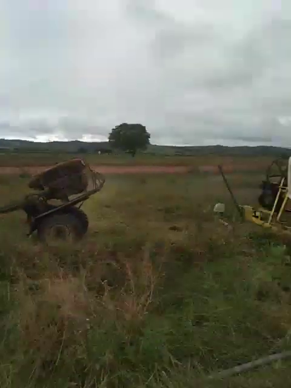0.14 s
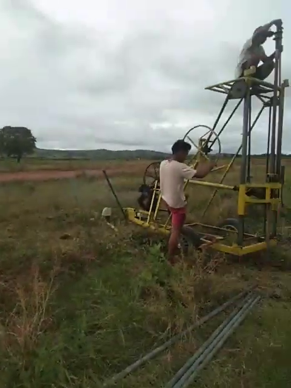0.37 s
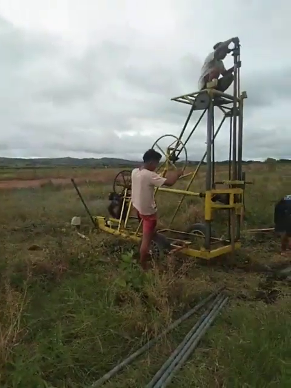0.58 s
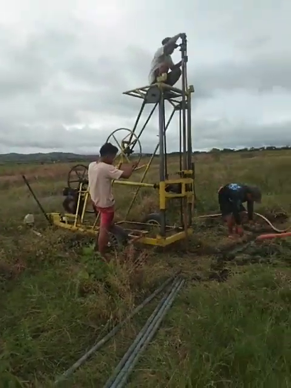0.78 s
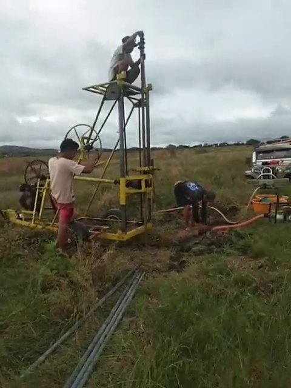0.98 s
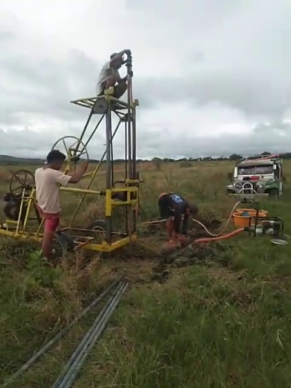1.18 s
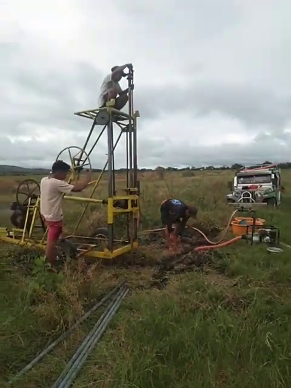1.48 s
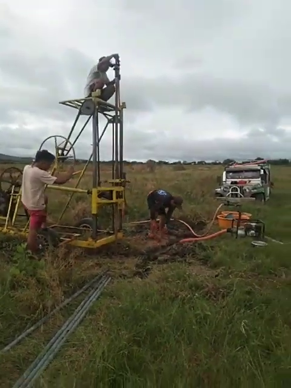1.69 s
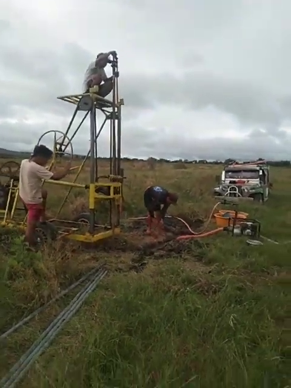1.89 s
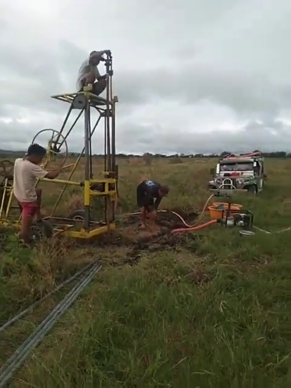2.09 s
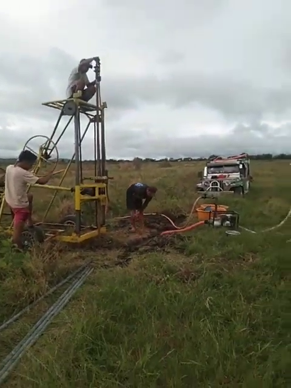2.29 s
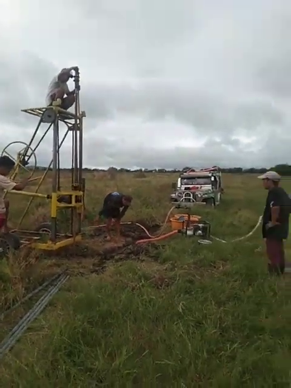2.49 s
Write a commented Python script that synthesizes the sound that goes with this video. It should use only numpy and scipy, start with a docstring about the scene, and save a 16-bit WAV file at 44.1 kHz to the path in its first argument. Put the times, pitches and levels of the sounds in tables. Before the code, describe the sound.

Single-cylinder diesel engine on a drilling rig clatters steadily, about sixteen sharp knocks a second, outdoors

```python
"""Open field: a single-cylinder diesel drives a well drilling rig, firing about 16 times a second.
Each firing is a set of noise bursts (knock, block ring, exhaust, piston slap, valves) over a steady
gear clatter, all ringing through casing resonances; soft low air pulses lie underneath.
The microphone swings round towards the rig: hollows glide through the tone and the level shifts.
Decaying sines make early bumps on its housing and late rig clanks; shaped noise makes gusts and rumble."""
import sys
import numpy as np
from scipy import signal
from scipy.fft import rfft, irfft
from scipy.io import wavfile
from scipy.ndimage import map_coordinates

SR = 44100
rng = np.random.default_rng(int(sys.argv[2]) if len(sys.argv) > 2 else 0)


def persist_wave(psi):
    """Save psi, clipped to +-1, as 16-bit WAV."""
    counts = np.round(np.clip(psi, -1, 1) * 32767).astype(np.int16)
    wavfile.write(sys.argv[1], SR, np.atleast_2d(counts).T)


N = 116865
TIME_S = np.arange(N) / SR

# Engine speed. Each row: time in seconds, firings per second.
SPEED = [(0, 16.22), (.45, 16.21), (.65, 16.15), (1.2, 16.15), (1.4, 16.19), (2.12, 16.19), (2.3, 15.92),
         (2.48, 16.15), (2.65, 16.17)]
FIRST_FIRING_S = .0607
# Hard firings. Each row: time in seconds, extra knock in dB, extra block ring in dB.
HARD_FIRINGS = [(.122, 0, 5), (.493, 2, 1), (.555, 2, 0), (.617, 2.5, 3), (.741, 2, 7.5), (1.112, 1.5, 9.5),
                (1.172, 1.5, 3), (1.235, 2, 0), (1.358, 2, 7), (1.79, 1.5, 6), (2.161, 2, 2),
                (2.349, 2.5, 7), (2.473, 5, 11.5)]

# Strokes of a cycle, before colour and casing. Each: delay after firing in seconds, attack in seconds,
# decay in seconds, level in dB, scatter in dB.
KNOCK = (-.0025, .0013, .0032, -15.8, 0.6)
BLOCK_RING = (-.0008, .0016, .0035, -25, 1.2)
EXHAUST = (.0115, .005, .0052, -19.1, 1.0)
EXHAUST_CRACK = (.0142, .0008, .003, -23.5, 1.2)
PISTON_SLAP = (.0045, .004, .012, -26.4, 1.5)
VALVE_CLOSE = (.0328, .0012, .0055, -24.8, 1.8)
VALVE_SEAT = (-.0165, .002, .006, -24.5, 2.0)
# Spectra of strokes and clatter. Each row: frequency in Hz, relative density in dB per Hz.
KNOCK_COLOUR = [(250, -29), (550, -31), (850, -17), (1200, -8), (1750, -5), (2600, -1), (4000, 0),
                (5000, 0), (6200, -4), (8300, -2), (10500, -10), (13000, -22), (16000, -33)]
BLOCK_COLOUR = [(700, -30), (1200, -13), (1550, -4), (1820, 0), (2200, -8), (2650, -5), (3300, -20),
                (8000, -40)]
EXHAUST_COLOUR = [(250, -21), (550, -24), (900, -13), (1400, -7), (2400, -3), (4200, -2), (6500, -1),
                  (8500, 0), (10500, -7), (13000, -19), (16000, -29)]
CRACK_COLOUR = [(1000, -30), (3000, -12), (6300, -2), (8800, 0), (11000, -4), (13000, -13), (16000, -28)]
SLAP_COLOUR = [(300, -30), (650, -24), (900, -5), (1300, -2), (2000, 0), (2800, 0), (4500, -4), (7000, -11),
               (14000, -33)]
VALVE_CLOSE_COLOUR = [(500, -28), (1500, -12), (2700, -5), (4300, -1), (6500, 0), (9000, -5), (12500, -18),
                      (16000, -27)]
VALVE_SEAT_COLOUR = [(600, -31), (1300, -7), (2500, 0), (4400, 0), (6000, -10), (9000, -15), (14000, -29)]
CLATTER_COLOUR = [(200, -24), (350, -29), (600, -23), (900, -18), (1400, -6), (2000, -1.5), (2800, 0),
                  (4500, 0), (6500, -8), (9500, -12), (13000, -29), (16000, -44)]
CLATTER_DB, CLATTER_GRAIN_DB = -30.9, 2.5  # level ahead of the casing, unevenness of grains
SAME_SHARE = .35  # share of a stroke's power that is alike in every cycle
STROKE_GRAIN_DB = 1.0
STROKE_RIPPLE_DB, STROKE_RIPPLE_HZ = 3.0, 380  # rms depth and spacing of points on a burst's own spectrum
# Resonances and gaps of casing and covers. Each row: frequency in Hz, width in Hz, boost in dB.
CASING = [(720, 120, -1.5), (930, 50, 13.5), (1285, 70, 6), (1420, 70, -3), (1505, 50, 5), (1830, 120, 3),
          (2030, 70, 7), (2230, 110, -3), (2450, 90, 4.5), (2755, 85, 8), (2966, 28, 7), (3130, 120, -3),
          (4440, 180, 3), (5863, 110, 3), (6330, 80, 8), (6760, 55, 9), (6920, 150, -4), (7560, 130, -5),
          (7860, 130, 6), (8400, 200, 2), (9040, 200, 3)]
# Low air pulses. Each row: delay after firing in seconds, length in seconds, pitch in Hz, width in Hz,
# relative level in dB.
THUMPS = [(-.003, .0075, 124, 60, -37), (.0115, .0052, 185, 70, -45)]
THUMP_SCATTER_DB = 1.4

# Engine level as the microphone turns. Each row: time in seconds, gain in dB.
LEVEL = [(0, -4.3), (.12, -2.5), (.2, .4), (.55, .2), (1.1, 0), (1.5, .3), (2.0, .7), (2.3, -.8),
         (2.65, -1.4)]
# Treble shelf as it turns. Each row: time in seconds, gain far above TREBLE_HZ in dB.
TREBLE = [(0, -10), (.15, -4), (.3, .3), (.55, 3), (1.0, .7), (1.5, 0), (2.0, -3), (2.65, -4)]
TREBLE_HZ = 8800  # half of the shelf's dB here
# Gliding hollows, one curve each. Each row: time in seconds, centre in Hz, half width in Hz, gain in dB.
HOLLOWS = [
    [(0, 1480, 120, -17), (.15, 1410, 225, -31), (.36, 1250, 175, -35), (.5, 1190, 180, -22),
     (.68, 1090, 190, -20), (.95, 1040, 120, -16), (1.2, 1060, 85, -15), (1.5, 1150, 105, -18),
     (1.7, 1205, 135, -26), (1.85, 1090, 70, -17), (2.18, 1100, 75, -15), (2.4, 1310, 115, -24),
     (2.65, 1330, 100, -18)],
    [(.4, 1400, 70, 0), (.58, 1360, 80, -10), (1.22, 1560, 80, -10), (1.4, 1600, 80, 0)],
    [(1.7, 1520, 90, 0), (2.05, 1650, 90, -10), (2.24, 1760, 90, -8), (2.33, 1800, 90, 0)],
    [(1.88, 2230, 100, 0), (2.08, 2310, 125, -12), (2.29, 2480, 100, 0)],
    [(0, 3680, 80, -9), (.75, 3680, 140, -7), (1.0, 3700, 130, -12), (1.2, 3490, 160, -22),
     (1.35, 3340, 110, -13), (1.64, 3470, 200, -27), (1.8, 3420, 140, -18), (2.06, 3650, 170, -23),
     (2.32, 3880, 130, 0)],
    [(1.8, 3200, 110, 0), (2.0, 3260, 150, -12), (2.2, 3300, 130, -12), (2.37, 3510, 215, -28),
     (2.65, 3510, 220, -25)],
]
# Tone while the microphone faces away. Each row: centre in Hz, half width in Hz, gain in dB.
AWAY_TONE = [(2230, 120, -10), (3330, 100, -14), (5280, 250, -24), (5620, 140, 6), (6500, 330, 6),
             (7850, 420, -19), (8800, 130, -20)]
AWAY_UNTIL_S = .19
WANDER_DB, WANDER_S, WANDER_HZ = 2.6, .11, 150  # random tone: depth, patch size in time and pitch

# Clanks of loose rig parts. Each row: start in seconds, pitch in Hz, level in dB.
CLANKS = [(1.972, 840, -28), (2.122, 565, -41), (2.268, 520, -43), (2.352, 1085, -29), (2.415, 1040, -30),
          (2.605, 1050, -29)]
CLANK_DECAY_S = .012
# Bumps on the microphone housing. Each row: start in seconds, level in dB.
BUMPS = [(.013, -29), (.020, -35), (.071, -27), (.102, -40), (.138, -42), (.178, -41)]
# Housing modes. Each row: pitch in Hz, relative level in dB, decay in seconds.
BUMP_MODES = [(422, 0, .011), (490, -7, .006), (385, -11, .028)]
# Gusts on the microphone. Each row: centre in seconds, half length in seconds, level in dB.
GUSTS = [(.01, .03, -37), (.065, .02, -35), (.14, .035, -45), (.34, .05, -39), (.83, .025, -44),
         (1.09, .04, -37), (1.38, .02, -52)]
# Spectra of gusts and rumble. Each row: frequency in Hz, relative density in dB per Hz.
WIND_COLOUR = [(20, -14), (50, -5), (95, 0), (150, -10), (300, -30), (800, -48)]
RUMBLE_COLOUR = [(20, -34), (45, -22), (70, -6), (110, -1), (200, 0), (300, -19), (700, -32)]
RUMBLE_DB = -49.6
LOW_CUT_HZ, CUTOFF_HZ = 40, 16200


def from_db(db):
    """Amplitude ratio of a level in dB."""
    return 10 ** (np.asarray(db) / 20)


def rms_one(x):
    """Scale to rms 1."""
    return x / np.sqrt(np.mean(x ** 2) + 1e-20)


def in_time(rows):
    """Columns of a curve at every sample."""
    times_s, *columns = np.transpose(rows)
    return [np.interp(TIME_S, times_s, column) for column in columns]


def causal(db):
    """Minimum-phase response for gains in dB: the cepstrum is folded onto positive time."""
    cepstrum = irfft(np.log(from_db(db)), axis=0)
    half = len(cepstrum) // 2
    cepstrum[1:half] *= 2
    cepstrum[half + 1:] = 0
    return np.exp(rfft(cepstrum, axis=0))


def colour(x, points, size=4096):
    """Causal filter with the given spectrum and unit power gain for white noise."""
    point_hz, point_db = np.transpose(points)
    bin_hz = np.arange(size // 2 + 1) * SR / size
    db = np.interp(np.log(bin_hz + 1), np.log(point_hz), point_db)
    rms_gain = np.sqrt(np.mean(from_db(db) ** 2))
    return signal.fftconvolve(x, irfft(causal(db)) / rms_gain)[:len(x)]


def resonator(hz, width_hz):
    """Two-pole band-pass coefficients, gain 1 at the peak."""
    r = np.exp(-np.pi * width_hz / SR)
    numerator = (1 - r * r) / 2 * np.array([1, 0, -1])
    return numerator, [1, -2 * r * np.cos(2 * np.pi * hz / SR), r * r]


def grains(grain_db):
    """Dense tiny impacts of uneven size; rms 1."""
    sizes = from_db(grain_db * rng.standard_normal(N))
    return rms_one(rng.standard_normal(N) * sizes)


def ring(start_s, hz, db, decay_s):
    """One struck mode: a sine with a quick rise and exponential fall."""
    age_s = np.maximum(TIME_S - start_s, 0)
    envelope = np.exp(-age_s / decay_s) * (1 - np.exp(-age_s * hz))
    return from_db(db) * np.sin(2 * np.pi * hz * age_s) * envelope


def firings():
    """Firing times: whole cycles of the integrated speed, plus one firing beyond each end."""
    cycles = np.cumsum(in_time(SPEED)[0]) / SR
    cycles -= np.interp(FIRST_FIRING_S, TIME_S, cycles)
    times = np.interp(np.arange(int(cycles[-1]) + 1), cycles, TIME_S)
    return np.r_[2 * times[0] - times[1], times, 2 * times[-1] - times[-2]]


def recolour(burst):
    """Each burst excites the metal differently: random peaks and dips in its spectrum."""
    hz = np.arange(rng.uniform(1, STROKE_RIPPLE_HZ), SR / 2, STROKE_RIPPLE_HZ)
    phase = rng.uniform(0, 2 * np.pi, len(hz))
    ripple_db = STROKE_RIPPLE_DB * np.sqrt(2) * np.sin(phase)
    return colour(burst, np.c_[hz, ripple_db], size=1024)


def stroke(times, shape, points, accents=()):
    """A burst of impacts in every cycle, partly alike each time: quick rise, exponential fall."""
    delay_s, attack_s, decay_s, db, scatter_db = shape
    age_s = TIME_S[:SR // 10]
    envelope = np.minimum(age_s / attack_s, 1) * np.exp(-np.maximum(age_s - attack_s, 0) / decay_s)
    alike = grains(STROKE_GRAIN_DB)[:len(age_s)]
    fresh = grains(STROKE_GRAIN_DB)
    half_cycle_s = 1 / SPEED[0][1] / 2
    out = np.zeros(N + 2 * SR)  # one second of margin at each end
    for s in times:
        at = int((s + delay_s) * SR) + np.arange(len(age_s))
        extra_db = sum(extra for when, extra in accents if abs(when - s) < half_cycle_s)
        impacts = np.sqrt(SAME_SHARE) * alike + np.sqrt(1 - SAME_SHARE) * fresh[at % N]
        gain = from_db(db + extra_db + scatter_db * rng.standard_normal())
        out[SR + at] += gain * recolour(envelope * impacts)
    return colour(out[SR:SR + N], points)


def gear_clatter():
    """Gear teeth: a steady stream of uneven grains."""
    return from_db(CLATTER_DB) * colour(grains(CLATTER_GRAIN_DB), CLATTER_COLOUR)


def engine_metal(times):
    """Strokes and gear clatter ring through the casing: resonators in series add or remove a band."""
    knock_accents = [(s, knock_db) for s, knock_db, _ in HARD_FIRINGS]
    block_accents = [(s, block_db) for s, _, block_db in HARD_FIRINGS]
    x = stroke(times, KNOCK, KNOCK_COLOUR, knock_accents)
    x += stroke(times, BLOCK_RING, BLOCK_COLOUR, block_accents)
    x += stroke(times, EXHAUST, EXHAUST_COLOUR)
    x += stroke(times, EXHAUST_CRACK, CRACK_COLOUR)
    x += stroke(times, PISTON_SLAP, SLAP_COLOUR)
    x += stroke(times, VALVE_CLOSE, VALVE_CLOSE_COLOUR)
    x += stroke(times, VALVE_SEAT, VALVE_SEAT_COLOUR)
    x += gear_clatter()
    for hz, width_hz, boost_db in CASING:
        band = signal.lfilter(*resonator(hz, width_hz), x)
        x = x + (from_db(boost_db) - 1) * band
    return x


def turning(x, size=1024):
    """Level and tone change as the microphone turns: gliding hollows and a slow random wander."""
    overlap = size - size // 4
    hz, s, frames = signal.stft(x, SR, nperseg=size, noverlap=overlap)
    hz = hz[:, None]

    def along(curve):
        """Columns of a curve at the frame times."""
        return [np.interp(s, TIME_S, column) for column in in_time(curve)]

    def bell(centre_hz, half_width_hz, gain_db):
        """Gaussian hollow or hump over frequency."""
        return gain_db * np.exp(-((hz - centre_hz) / half_width_hz) ** 2)

    treble_db = along(TREBLE)[0] / (1 + (TREBLE_HZ / (hz + 1)) ** 4)
    hollows_db = sum(bell(*along(curve)) for curve in HOLLOWS)
    facing_away = np.exp(-(s / AWAY_UNTIL_S) ** 4)
    away_db = sum(bell(*row) for row in AWAY_TONE) * facing_away
    patches = rng.standard_normal((256, 256))
    where = np.broadcast_arrays(hz / WANDER_HZ, s / WANDER_S)
    wander_db = WANDER_DB * map_coordinates(patches, where, mode="mirror")
    gain_db = along(LEVEL)[0] + treble_db + hollows_db + away_db + wander_db
    return signal.istft(frames * from_db(gain_db), SR, nperseg=size, noverlap=overlap)[1][:N]


def engine_thumps(times):
    """Soft air pulses: the slope of a triangular push, ringing briefly at a low pitch."""
    out = np.zeros(N)
    for delay_s, length_s, hz, width_hz, db in THUMPS:
        pushes = np.zeros(N)
        for s in times:
            corners_s = s + delay_s + length_s * np.array([0, .5, 1])
            size = from_db(THUMP_SCATTER_DB * rng.standard_normal())
            pushes += size * np.interp(TIME_S, corners_s, [0, 1, 0])
        slope = np.diff(pushes, prepend=0)
        out -= from_db(db) * rms_one(signal.lfilter(*resonator(hz, width_hz), slope)) / np.pi
    return out


def rig_clanks():
    """Loose rig parts: one short mode per clank."""
    return sum(ring(s, hz, db, CLANK_DECAY_S) for s, hz, db in CLANKS)


def housing_bumps():
    """Knocks on the microphone housing: each excites all of its modes."""
    return sum(ring(s, hz, db + mode_db, decay_s)
               for s, db in BUMPS for hz, mode_db, decay_s in BUMP_MODES)


def wind():
    """Short gusts of low noise over a steady low rumble."""
    swell = sum(from_db(db) * np.exp(-((TIME_S - s) / half_s) ** 2) for s, half_s, db in GUSTS)
    gusts = swell * colour(rng.standard_normal(N), WIND_COLOUR)
    rumble = from_db(RUMBLE_DB) * colour(rng.standard_normal(N), RUMBLE_COLOUR)
    return gusts + rumble


def scene():
    """Engine, rig, handling and wind in one channel; turning shapes only the engine metal."""
    times = firings()
    engine = turning(engine_metal(times)) + engine_thumps(times)
    return (engine + rig_clanks() + housing_bumps() + wind())[None]


def record(dry):
    """Cut the deepest bass and the top."""
    low_cut = signal.butter(2, LOW_CUT_HZ, "high", fs=SR, output="sos")
    top_cut = signal.ellip(10, .2, 70, CUTOFF_HZ, fs=SR, output="sos")  # .2 dB ripple, 70 dB stop
    return signal.sosfilt(top_cut, signal.sosfilt(low_cut, dry))


dry = scene()
out = record(dry)
persist_wave(out)
```